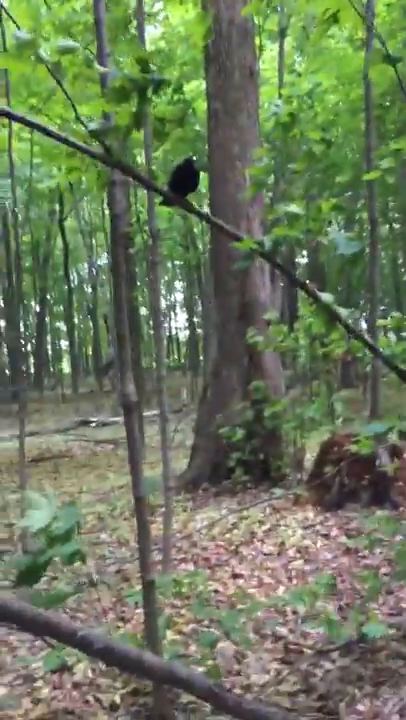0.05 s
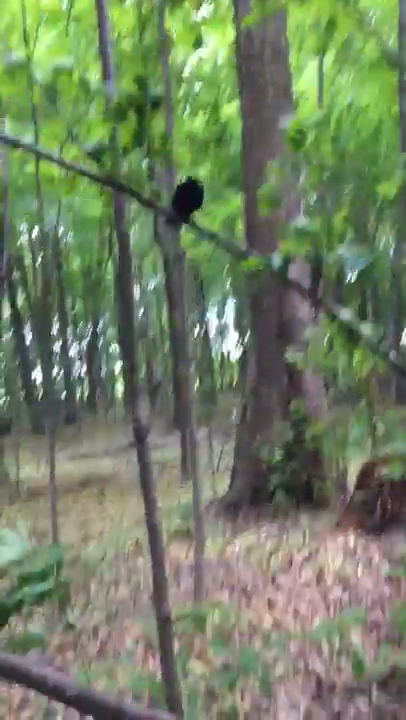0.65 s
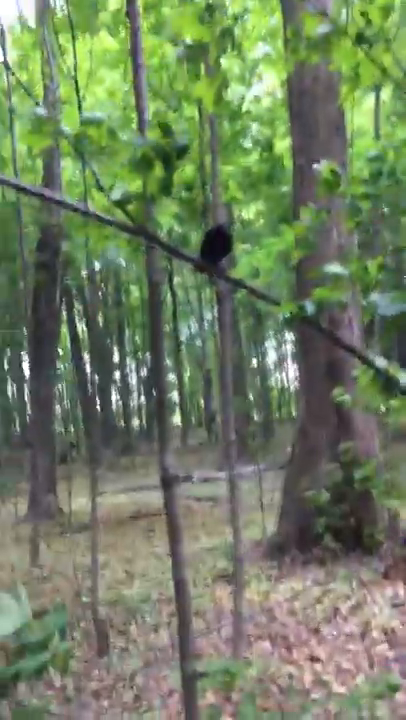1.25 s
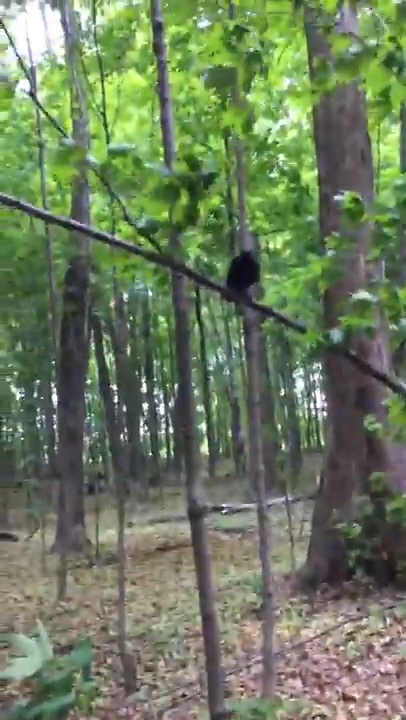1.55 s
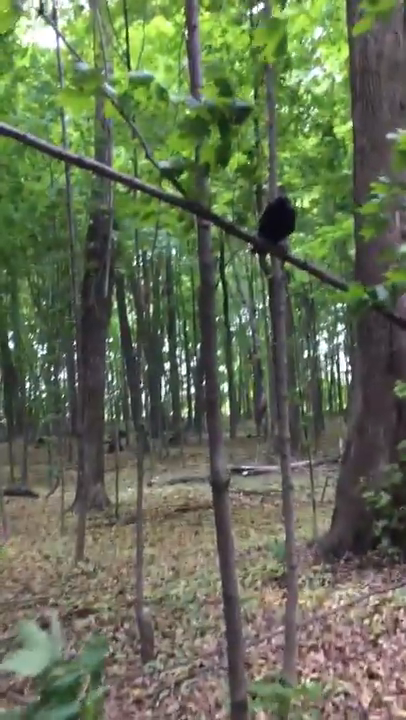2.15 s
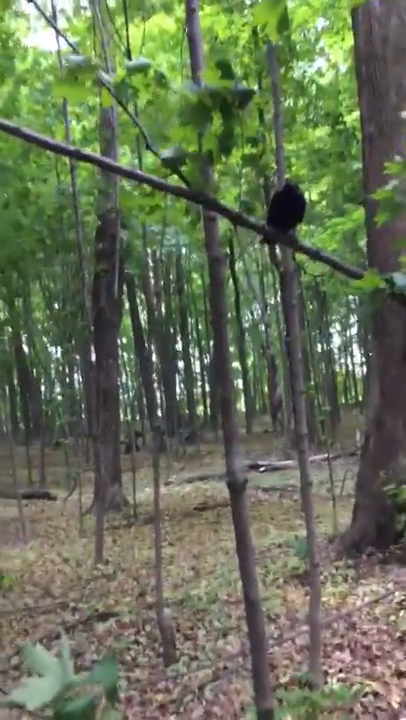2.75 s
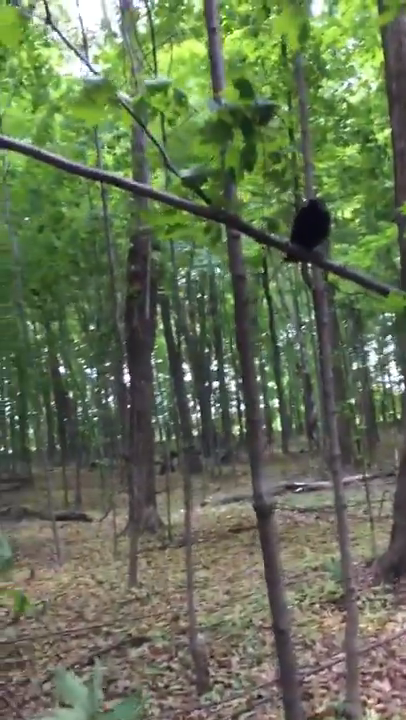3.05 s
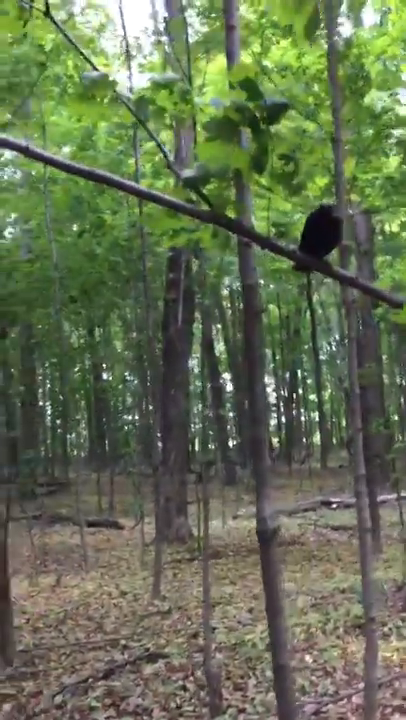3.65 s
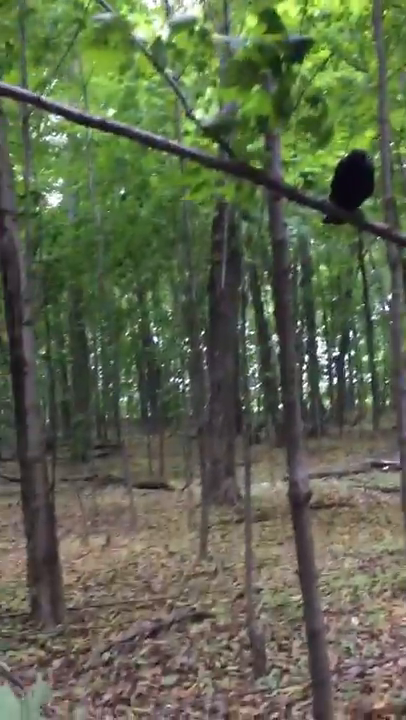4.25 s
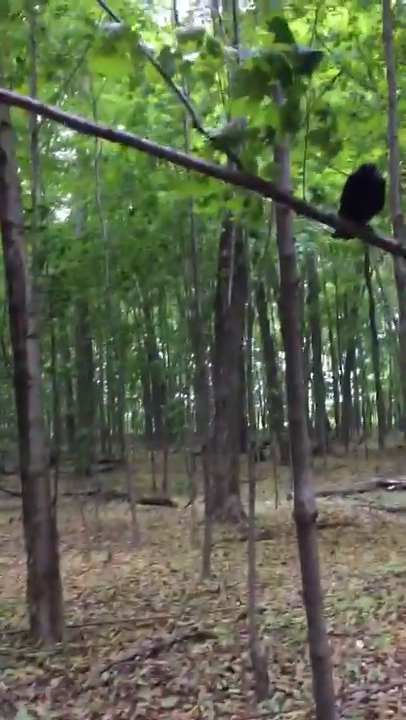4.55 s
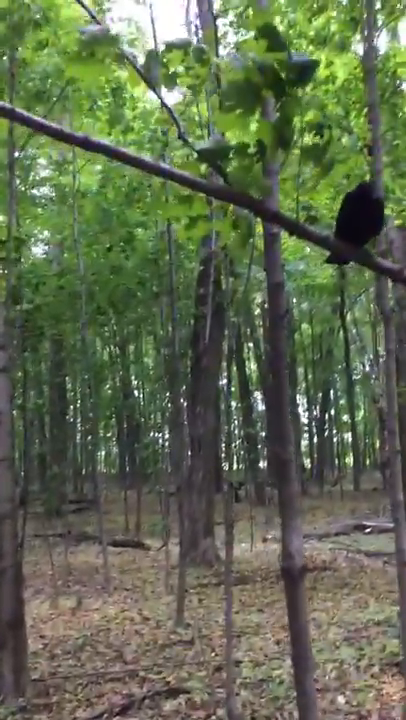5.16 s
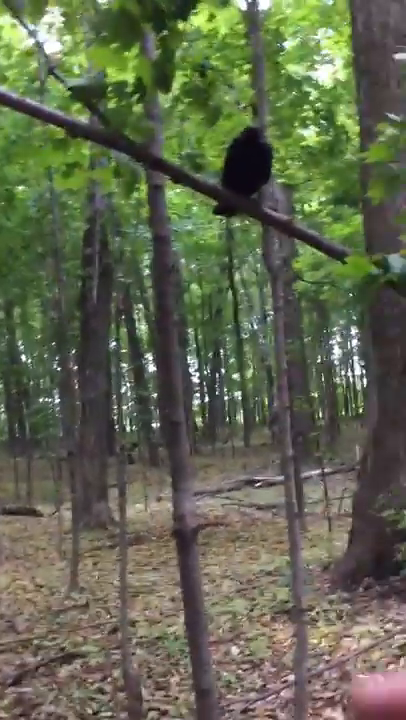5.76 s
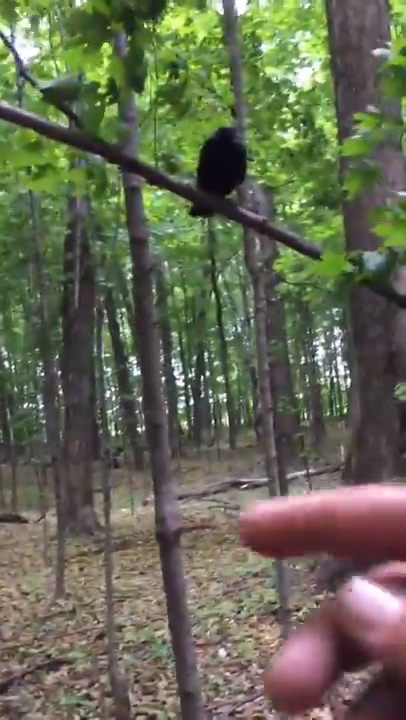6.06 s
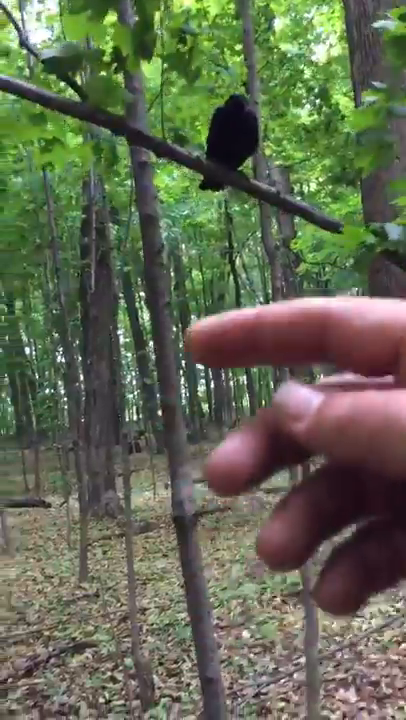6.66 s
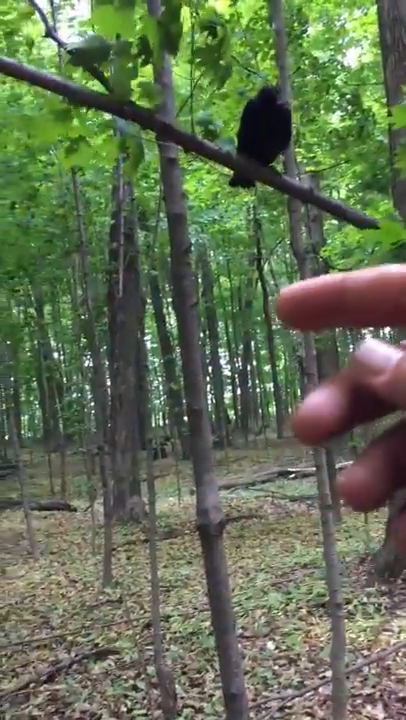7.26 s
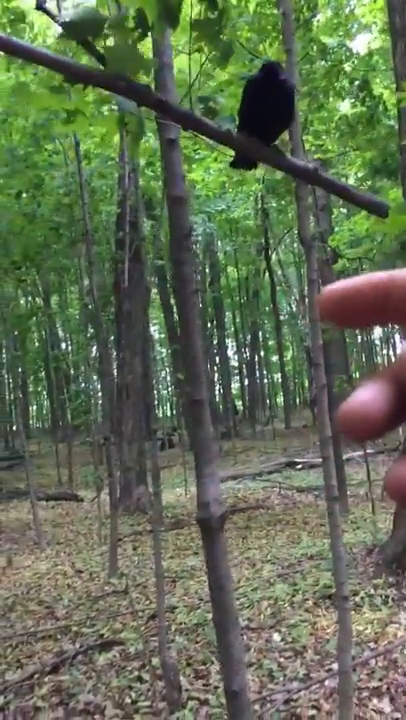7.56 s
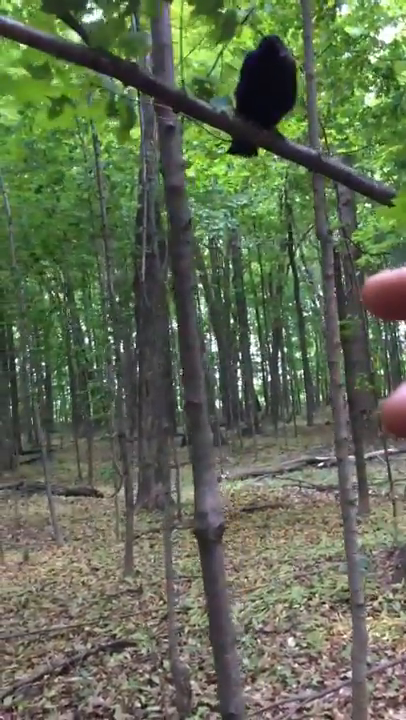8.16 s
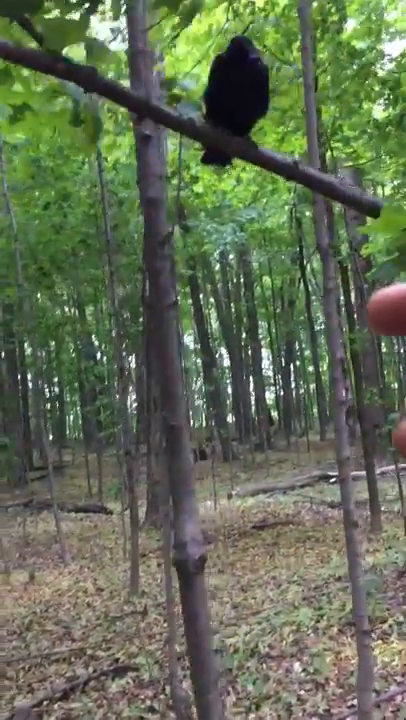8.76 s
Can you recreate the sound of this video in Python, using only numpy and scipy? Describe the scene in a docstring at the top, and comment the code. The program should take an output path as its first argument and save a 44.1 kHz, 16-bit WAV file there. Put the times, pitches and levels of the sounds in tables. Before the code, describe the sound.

Wind bumps and rumbles on the microphone in short, choppy gusts while careful footsteps crush and brush dry leaves on a forest floor. Small, sharp twig snaps dot the steps from start to finish. Distant birds sing scattered, echoing chirps, and midway a nearer one whistles upward and flicks down. Behind everything, faraway leaves make a soft, steady hiss.

```python
"""Low, lumpy puffs of wind hit the microphone while someone creeps through dry forest leaves.
Each slow step crushes leaves into many tiny cracks, and twigs snap and ring for an instant.
Songbirds whistle short, sliding notes that echo among the trunks.
Under it all lies the faint hush of distant foliage."""
import sys
import numpy as np
from scipy import signal
from scipy.fft import rfft, irfft
from scipy.io import wavfile
from scipy.ndimage import uniform_filter1d

SR = 44100
rng = np.random.default_rng(int(sys.argv[2]) if len(sys.argv) > 2 else 0)


def int16_out(signal):
    """Quantize to a 16-bit WAV file."""
    q = np.round(np.clip(np.atleast_2d(signal).T, -1, 1) * 32767)
    wavfile.write(sys.argv[1], SR, q.astype(np.int16))


N = 388080
TIME = np.arange(N) / SR

# Tone colours. Each row: frequency in Hz, relative strength there in dB.
HUSH_COLOUR = [(30, -5), (100, -11.5), (300, -1), (600, -9.5), (1200, -10.5), (2600, -10), (4000, -13.5),
               (7000, -18), (15000, -23)]   # distant foliage
BIG_SWIRL_COLOUR = [(20, -13), (35, -5.5), (50, -0.5), (67, 4), (90, 0.5), (130, -2.5), (170, -10),
                    (220, -26.5), (300, -37.5), (500, -79), (900, -84)]   # big swirls of air
SMALL_SWIRL_COLOUR = [(60, -9), (130, -1.5), (190, 4), (260, -6.5), (340, -15), (450, -27), (650, -33),
                      (1200, -64), (3000, -96)]   # small swirls of air
CRISP_TREBLE = [(4200, 4.5), (5000, 1), (6100, 5), (7530, 0), (9000, 3), (9800, 2), (10400, -3),
                (11400, 2.5), (13500, 1), (15500, -0.5)]   # the crisp top leaves
CRISP_BASS = [(600, -35), (1500, -10.5), (3000, -3)]   # how their sound thins out toward the bass
CRUSH_COLOUR = [(150, -35), (400, -7), (750, -5.5), (1300, -2), (2200, -0.5), (3200, -2.5), (4500, -8.5),
                (7000, -12.5), (15000, -80)]   # the duller leaves underneath

# The smooth draught on the microphone. Each row: time in seconds, relative level in dB.
DRAUGHT = [(0, -42), (1.35, -45), (1.65, -61.5), (1.76, -53), (2.1, -49), (2.3, -38.5), (3.22, -43.5),
           (3.6, -41.5), (4.52, -45.5), (4.68, -72), (4.9, -58), (5.3, -77), (5.44, -60), (5.56, -48.5),
           (7.3, -51), (8.15, -47), (8.5, -44), (8.8, -69)]
# Gusts on top of it. Each row: time of full strength in seconds, hold in seconds,
# relative level of the big swirls in dB, small swirls compared with them in dB.
WIND_GUSTS = [(0.032, .08, -39, -15), (0.327, 0.063, -31, -13.5), (0.436, .03, -33.5, -17),
              (0.572, 0.26, -40.5, -15), (0.974, 0.044, -40, -11.5), (1.07, .25, -31, -10.5),
              (1.49, 0.054, -48.5, -15.5), (1.914, .04, -48, -29), (2.241, 0.038, -30, -14),
              (2.369, .25, -36, -10.5), (2.705, 0.021, -30.5, -18.5), (2.993, 0.037, -37.5, -6.5),
              (3.049, 0.067, -25.5, -4), (3.4, 0.013, -22.5, -13.5), (3.611, 0.1, -38, -15.5),
              (3.864, 0.16, -31, -16), (4.129, 0.096, -31.5, -12.5), (4.337, 0.029, -32, -24),
              (4.748, 0.042, -44, -15.5), (5.1, 0.019, -49.5, -32), (5.492, 0.038, -38, -12),
              (5.683, 0.026, -41, -22), (6.122, .09, -40, -11.5), (6.3, .04, -28, -13.5),
              (6.672, 0.15, -38.5, -20), (6.96, 0.17, -31.5, -11), (7.524, 0.22, -43, -26),
              (7.829, .18, -39, -20), (8.289, 0.025, -40, -7.5), (8.394, 0.037, -45, -9)]
# Single hard lumps of air, and last the low thud of the twig that breaks at 8.72 s. Each row: time in seconds,
# relative level in dB, pitch in Hz.
AIR_LUMPS = [(0.361,-12.5,128), (0.464,-23.5,90), (0.576,-20.5,165), (0.668,-23,144), (0.729,-24.5,136),
             (0.832,-24.5,154), (1.105,-15.5,149), (1.148,-20.5,182), (1.214,-21.5,230), (1.301,-8.5,136),
             (1.501,-34,181), (2.276,-23,85), (2.397,-12,139), (2.512,-21,145), (2.621,-24,159),
             (2.719,-16.5,126), (3.061,-16,203), (3.103,-14.5,213), (3.403,-31.5,506), (3.408,-4.5,98),
             (3.422,-12,109), (3.897,-21.5,140), (3.923,-18,157), (4.159,-11.5,147), (4.201,-31,430),
             (4.202,-9,122), (4.337,-17,113), (6.308,-14.5,114), (6.334,-12,100), (6.794,-22,104),
             (7.032,-18,163), (7.095,-15,157), (7.12,-20,122), (8.302,-26,109), (8.546,-35,184),
             (8.726,-41.5,192)]
# A foot presses or brushes the leaves. Each row: start, swell, hold and time to fade 20 dB, all in
# seconds, then relative level of the crackle in dB, and the dB added to that for the dull crush.
FOOTSTEPS = [(0.023, 0.061, 0.052, .2, -70, -4.5), (0.118, 0.05, .14, -0.03, -59.5, -6),
             (0.296, 0.08, 0.063, 0.4, -52, -4.5), (0.543, 0.0399, 0.32, 0.24, -61.5, -8.5),
             (0.922, 0.014, 0.014, 0.25, -61, -3.5), (1.077, 0.029, 0.053, -0.02, -64.5, -5.5),
             (1.532, 0.08, .1, 0.11, -53.5, -2.5), (1.808, 0.023, 0.1, 0.1, -61.5, -6.5),
             (1.998, .02, 0.0082, .5, -63.5, 0.5), (2.58, 0.017, 0.08, .1, -74, -4.5),
             (2.758, 0.056, 0.064, .5, -51, -8.5), (3.016, .015, 0.058, .2, -50.5, -4.5),
             (3.136, 0.037, 0.032, .11, -49.5, -5), (3.272, 0.022, 0.12, 0.2, -61, -8.5),
             (3.616, 0.023, 0.454, -1, -70, -5.5), (4.055, 0.057, 0.024, 0.11, -57, -4),
             (4.481, 0.05, .04, 0.74, -62, -1.5), (4.603, 0.019, 0.036, 0.24, -45, -9),
             (4.718, 0.024, 0.2, .28, -54, -5.5), (5.066, .015, 0.015, 0.22, -57.5, -5),
             (5.25, .05, .01, 0.37, -64, -3), (5.385, 0.0091, 0.0089, 0.33, -61, -3),
             (5.517, 0.027, 0.075, 0.36, -64.5, -6.5), (5.899, 0.027, 0.048, 0.33, -59, -11),
             (5.971, 0.041, 0.13, 0.3147, -48.5, -6.5), (6.25, 0.0098, .02, 0.14, -63.5, -3.5),
             (6.546, 0.14, 0.029, -0.17, -69, -1), (6.706, 0.025, 0.14, 0.29, -60, -6.5),
             (7.441, .04, 0.17, 1.3, -73.5, -2.5), (8.118, 0.031, 0.36, 0.5, -69.5, -5),
             (8.413, .055, 0.023, .28, -61.5, -5.5), (8.701, 0.016, 0.028, 0.8, -60.5, -4.5)]
# Notes of far birds. Each row: start in seconds, length in seconds, low and high pitch in Hz,
# relative level in dB, name of the slide.
FAR_NOTES = [(0.499, 0.17, 2595, 4416, -52, "swoop"), (0.672, 0.079, 2840, 3650, -53, "rise"),
             (1.97, 0.098, 3100, 4170, -52, "swoop"), (2.092, .16, 2400, 3930, -54.5, "swoop"),
             (2.491, 0.11, 2530, 3560, -67, "swoop"), (2.613, 0.13, 2350, 3310, -67, "swoop"),
             (3.689, 0.094, 5000, 5990, -58.5, "fall"), (3.791, 0.094, 5020, 5840, -55.5, "fall"),
             (3.895, 0.15, 2574, 4430, -51.5, "swoop"), (4.243, 0.15, 2520, 4100, -65, "swoop"),
             (4.409, 0.057, 3010, 3430, -60, "fall"), (5.602, 0.057, 3210, 4300, -51, "rise"),
             (5.677, 0.085, 2495, 3530, -55.5, "fall"), (5.778, 0.03, 3014, 3100, -48.5, "fall"),
             (5.813, 0.045, 3000, 4120, -54, "rise"), (5.843, 0.1, 1834, 2100, -55.5, "rise"),
             (6.545, 0.12, 2600, 3140, -65, "fall"), (7.545, .14, 4370, 5450, -61, "swoop"),
             (7.696, 0.1, 3610, 5740, -52, "rise"), (7.882, 0.16, 2510, 4140, -51.5, "swoop")]
# The pitch slides, by name. Each row: share of the note's length, share of its pitch range.
SLIDES = {"swoop": [(0, .48), (.2, 0.42), (.4, 0), (.58, .35), (.78, 0.98), (1, 0.72)], "rise": [(0, 0),
          (.5, 0.45), (.8, 0.98), (1, 0.95)], "fall": [(0, 1), (.38, .08), (1, 0)]}
# The near bird's whistle rises, then flicks down. Each row: time in seconds, pitch in Hz, level in dB.
NEAR_WHISTLE = [(4.445, 1940, -57.5), (4.48, 2274, -50), (4.55, 2766, -42.5), (4.605, 3220, -40.5),
                (4.635, 2450, -49)]
# Breaking twigs. Each row: time in seconds, relative level of the ring in dB, its pitch in Hz,
# relative level of the splinter crack in dB.
TWIG_SNAPS = [(0.633,-36,2116,-59.5), (0.757,-45.5,2170,-64), (0.823,-47,660,-42.5), (0.874,-36.5,1870,-62),
              (1.539,-49,2350,-58), (1.554,-45,3330,-58), (1.819,-39,3290,-55), (1.966,-38,3420,-58),
              (2.037,-32,610,-40), (2.04,-33.5,1800,-54), (2.434,-66,2960,-62.5), (2.86,-43,1820,-46),
              (3.038,-34,2150,-45), (4.837,-38.5,2500,-56), (4.941,-31.5,2670,-39), (5.071,-45,1840,-45.5),
              (5.085,-60.5,1960,-46), (5.113,-41,2820,-53), (5.396,-47.5,1590,-57), (5.64,-46,2160,-56),
              (5.781,-52,3020,-57), (6.17,-37,2300,-44), (6.295,-31.5,950,-38.5), (6.362,-43,2970,-46.5),
              (6.715,-31.5,1800,-57), (6.741,-50,1080,-47), (6.967,-59,1410,-51), (7.514,-41.5,2530,-54.5),
              (7.592,-38,669,-64), (7.69,-48.5,1390,-64), (8.151,-51,3040,-51), (8.297,-47,700,-61),
              (8.338,-48,950,-58), (8.404,-54,974,-55), (8.433,-34.5,1020,-43.5), (8.476,-41.5,2150,-44.5),
              (8.719,-31.5,1360,-43)]


def from_db(db):
    """Turn decibels into a number to multiply by."""
    return 10 ** (np.asarray(db) / 20)


def unit_power(x):
    """Scale a sound to an average power of one."""
    return x / np.sqrt(np.mean(x ** 2) + 1e-20)


def coloured(x, colour):
    """Give a sound a tone colour, at a power of one."""
    hz, db = np.transpose(sorted(colour))
    bins_hz = np.maximum(np.arange(N // 2 + 1) * SR / N, 1)
    gain = from_db(np.interp(np.log(bins_hz), np.log(hz), db))
    return unit_power(irfft(rfft(x) * gain, N))


def band(x, low_hz, high_hz):
    """Keep what lies between two frequencies."""
    edges_hz = [low_hz, min(high_hz, .45 * SR)]
    return signal.sosfilt(signal.butter(2, edges_hz, "band", fs=SR, output="sos"), x)


def wobble(low_hz, high_hz):
    """A random wiggle at speeds between the two frequencies."""
    return unit_power(band(rng.standard_normal(N), low_hz, high_hz))


def evened(x, span_s):
    """Even out loudness changes slower than span_s."""
    size = int(span_s * SR)
    power = uniform_filter1d(uniform_filter1d(x ** 2, size), size)
    return x / np.sqrt(np.abs(power) + 1e-9)


def add(out, start_s, sound):
    """Mix a short sound into a longer one."""
    at = max(int(start_s * SR), 0)
    out[at:at + len(sound)] += sound[:max(N - at, 0)]


def envelope(start_s, swell_s, hold_s, fade_s):
    """Swell, hold, then drop 20 dB every fade_s; a negative fade_s stops it abruptly."""
    swell = np.clip((TIME - start_s) / swell_s, 0, 1)
    fade = np.clip((TIME - start_s - swell_s - hold_s) / max(fade_s, 1e-3), 0, 10)
    return swell * from_db(-20 * fade)


def hush(level_db=-70.5):
    """Distant foliage blends into a soft, steady noise."""
    return from_db(level_db) * coloured(rng.standard_normal(N), HUSH_COLOUR)


def wind_strength(swell_s=0.023, fade_s=0.051):
    """Strength of the big and small swirls: choppy gusts ride on a smooth draught."""
    times, draught_db = np.transpose(DRAUGHT)
    big = from_db(np.interp(TIME, times, draught_db)) ** 2
    small = big * from_db(-25.5) ** 2   # the draught has few small swirls
    for s, hold_s, db, small_db in WIND_GUSTS:
        power = (from_db(db) * envelope(s - swell_s, swell_s, hold_s, fade_s)) ** 2
        big += power
        small += power * from_db(small_db) ** 2
    return np.sqrt(big), np.sqrt(small)


def wind(big_db=-0.5, small_db=3.0, lump_db=0.5, bass_cut_hz=54, bass_cut_q=1.025):
    """Swirls of air flutter at the microphone's opening; big ones strike as single lumps of pressure."""
    big, small = wind_strength()
    flutter = from_db(3.8 * np.clip(wobble(9, 28), -2.5, 1.2))
    rumble = evened(coloured(rng.standard_normal(N), BIG_SWIRL_COLOUR), span_s=0.057)
    swirls = evened(coloured(rng.standard_normal(N), SMALL_SWIRL_COLOUR), span_s=0.013)
    out = flutter * (from_db(big_db) * big * rumble + from_db(small_db) * small * swirls)
    t = TIME[:4096] - TIME[2048]
    for s, db, hz in AIR_LUMPS:
        width_s = 0.0019 * from_db(-0.19 * (db + 23.5))   # harder lumps are shorter
        swing = np.sin(2 * np.pi * hz * t)   # a pull, then a push
        add(out, s + t[0], from_db(db + lump_db) * swing / np.cosh(t / width_s))
    # the opening cuts the deepest bass and rings briefly after each lump
    w = 2 * np.pi * bass_cut_hz
    bass_cut = signal.bilinear([1, 0, 0], [1, w / bass_cut_q, w * w], SR)
    return signal.lfilter(*bass_cut, out)


def foot_pressure():
    """How strongly the steps stir the crisp top leaves and the ones underneath."""
    crisp, crush = from_db(-82) ** 2, from_db(-83.5) ** 2   # leaves settle under a resting foot
    for s, swell_s, hold_s, fade_s, db, dull_db in FOOTSTEPS:
        power = (from_db(db) * envelope(s, swell_s, hold_s, fade_s)) ** 2
        crisp += power
        crush += power * from_db(dull_db) ** 2
    return np.sqrt(crisp), np.sqrt(crush)


def leaf_cracks(per_s, spread_db, decay_s):
    """The jumpy loudness of leaves cracking at random: tiny bursts, a few much bigger than the rest."""
    sizes = from_db(spread_db * np.minimum(rng.exponential(1, N), 5))
    hits = (rng.random(N) < per_s / SR) * sizes ** 2
    power = signal.lfilter([1], [1, -np.exp(-1 / (decay_s * SR))], hits + 1e-6)
    return evened(np.sqrt(power), span_s=0.1)


def leaves(crisp_db=1.5, crush_db=7.5, sliding=0.65, flake_gain=0.86, clump_db=5.0):
    """More weight on the foot breaks more leaves a second; leaves sliding together fill the gaps."""
    crisp, crush = foot_pressure()
    cracks_per_s = 1500 * (crisp / from_db(-50.5)) ** 0.6
    cracks = leaf_cracks(cracks_per_s, spread_db=2.0, decay_s=0.0013)
    crackle = np.sqrt(cracks ** 2 + sliding ** 2) * rng.standard_normal((2, N))
    # small flakes each crack in their own pitch range, so the colour keeps shifting
    edges_hz = [600, 1600, 3200, 6000, 10000, 17000]
    for low, high in zip(edges_hz, edges_hz[1:]):
        flakes = leaf_cracks(cracks_per_s * .3, spread_db=3.0, decay_s=0.0025)
        clumps = from_db(clump_db * np.tanh(wobble(8.9, 23)))
        crackle += flake_gain * band(clumps * flakes * rng.standard_normal((2, N)), low, high)
    top = coloured(crackle[0], CRISP_BASS + CRISP_TREBLE)
    deep = coloured(crackle[1], CRUSH_COLOUR)
    return from_db(crisp_db) * crisp * top + from_db(crush_db) * crush * deep


def sliding_note(start_s, length_s, low_hz, high_hz, db, slide):
    """Stretch a slide over one bird note, giving rows of time, pitch and level."""
    return [(start_s + when * length_s, low_hz + height * (high_hz - low_hz), db)
            for when, height in sorted(SLIDES[slide])]


def whistle(notes, waver, rasp, fade_s=0.0031):
    """A bird's pure, gliding tone; waver shakes its pitch and rasp shakes its loudness."""
    out = np.zeros(N)
    tremble = 1 + waver * wobble(31, 200)
    for note in notes:
        s, hz, db = np.transpose(note)
        during = slice(int(s[0] * SR), int(s[-1] * SR))
        t = TIME[during]
        fade = np.clip(np.minimum(t - s[0], s[-1] - t) / fade_s, 0, 1)
        phase = 2 * np.pi * np.cumsum(np.interp(t, s, hz) * tremble[during]) / SR
        out[during] += fade * from_db(np.interp(t, s, db)) * np.sin(phase)
    return out * (1 + rasp * wobble(34, 136))


def echoes(x, decay_s, per_s):
    """Many small echoes that die away by 60 dB in decay_s."""
    t = TIME[:SR]
    hits = rng.random(SR) < per_s / SR
    tail = rng.standard_normal(SR) * hits * from_db(-60 * t / decay_s) * (t > .003)
    tail /= np.sqrt(np.sum(tail ** 2) + 1e-12)
    return signal.fftconvolve(x, tail)[:N]


def birds():
    """Far songs come mostly as echoes off close trunks, then the whole wood; the near one echoes less."""
    far = whistle([sliding_note(*note) for note in FAR_NOTES], waver=.013, rasp=.5)
    near = whistle([NEAR_WHISTLE], waver=.002, rasp=.08)
    off_trunks = from_db(-4.5) * echoes(far, decay_s=0.25, per_s=550)
    off_wood = echoes(from_db(-3) * far + from_db(-7.5) * near, decay_s=0.94, per_s=900)
    return near + from_db(-6) * far + off_trunks + off_wood


def twigs(ring_db=6.5, crack_db=7.5, decay_cycles=0.95, crack_s=0.0023):
    """A breaking twig splinters with a bright crack, and the stick rings for just a few vibrations."""
    out, t = np.zeros(N), TIME[:2048]
    for s, db, hz, splinter_db in TWIG_SNAPS:
        ring = np.zeros(len(t))
        for tone_hz, tone_db in [(hz * 0.413, -18), (hz, 0), (hz * 1.75, -8.5)]:
            tone = np.sin(2 * np.pi * tone_hz * t) * np.exp(-t * tone_hz / decay_cycles)
            ring += from_db(tone_db) * tone * rng.choice([-1, 1])
        burst = rng.standard_normal(len(t)) * np.exp(-t / crack_s)
        crack = band(burst, 1200, 5500 + 5 * hz)   # thick, low sticks crack duller
        add(out, s, from_db(db + ring_db) * ring + from_db(splinter_db + crack_db) * crack)
    return out + from_db(-10) * echoes(out, decay_s=0.051, per_s=3200)


def scene():
    """Steps, wind and birds over the hush of the forest, in one channel."""
    return (leaves() + twigs() + wind() + birds() + hush())[None]


def record(dry):
    """The very highest treble is cut off steeply."""
    cutoff_hz = 15900
    return signal.sosfilt(signal.ellip(12, .2, 80, cutoff_hz, fs=SR, output="sos"), dry)


dry = scene()
out = record(dry)
int16_out(out)
```